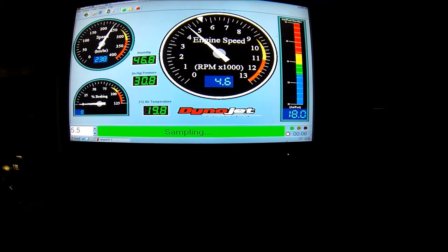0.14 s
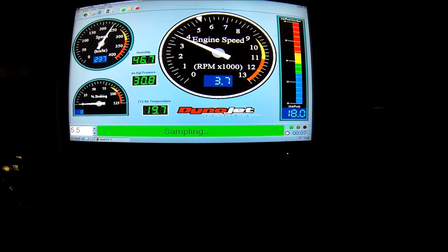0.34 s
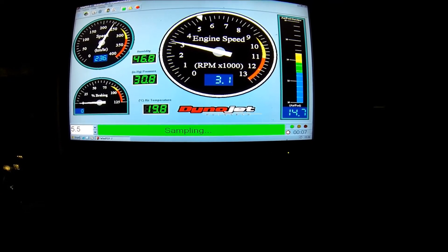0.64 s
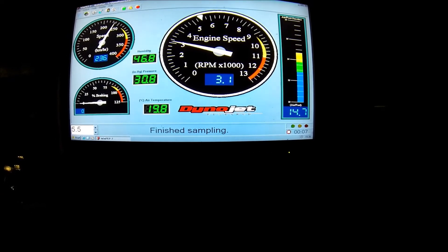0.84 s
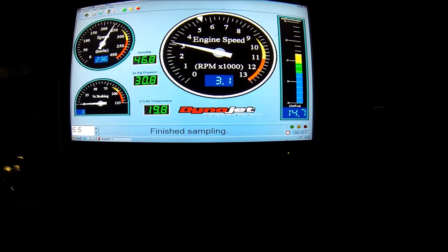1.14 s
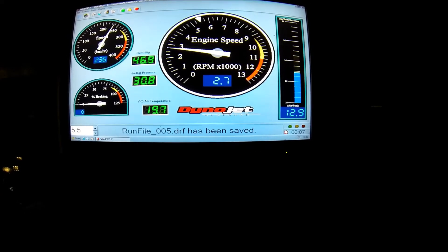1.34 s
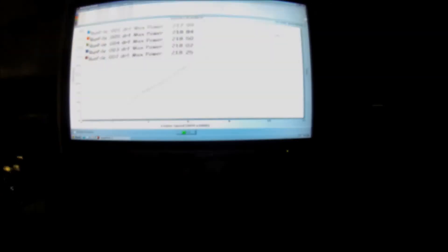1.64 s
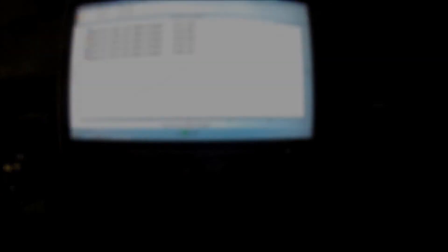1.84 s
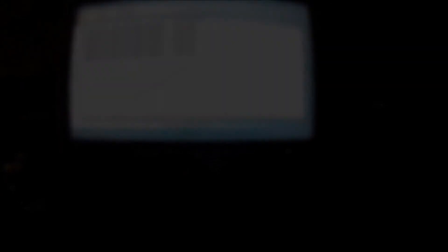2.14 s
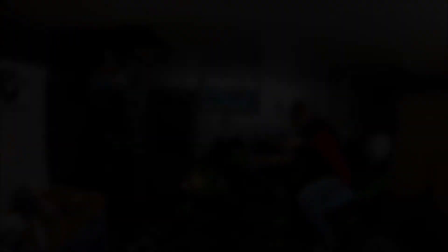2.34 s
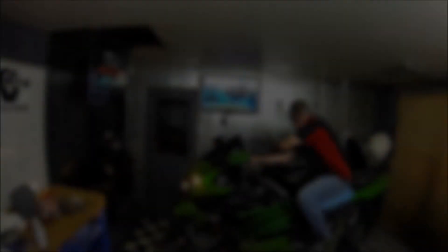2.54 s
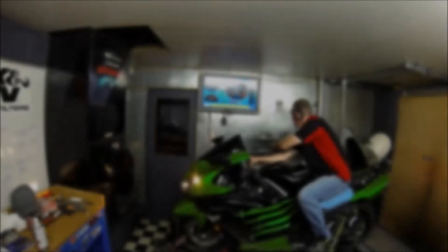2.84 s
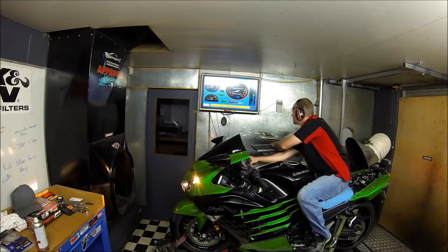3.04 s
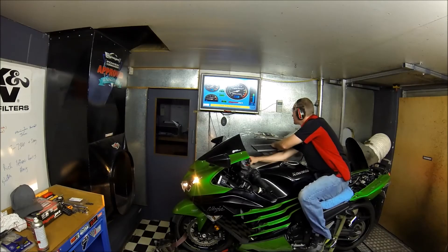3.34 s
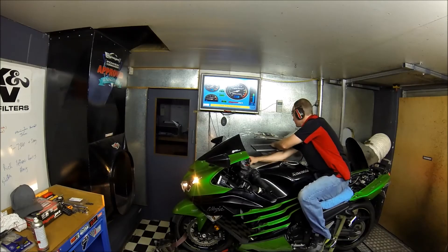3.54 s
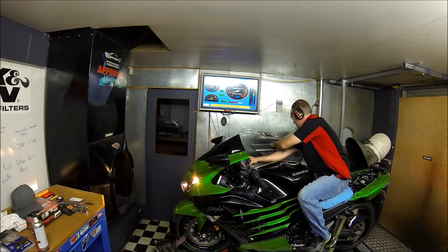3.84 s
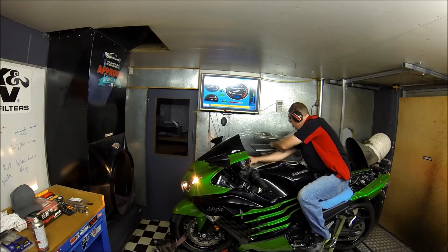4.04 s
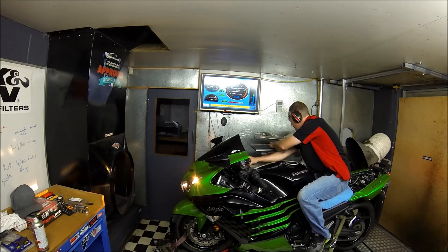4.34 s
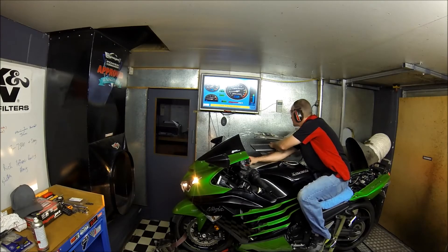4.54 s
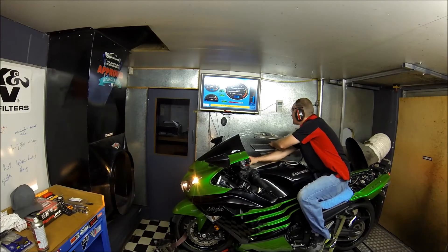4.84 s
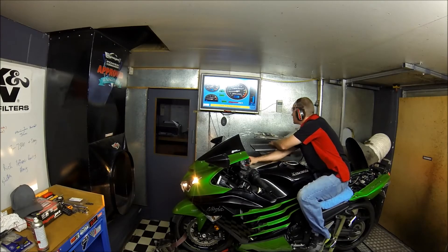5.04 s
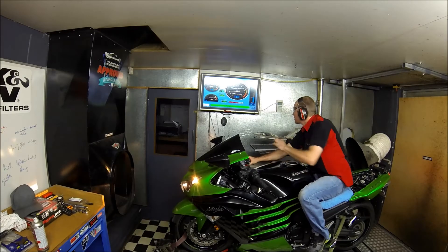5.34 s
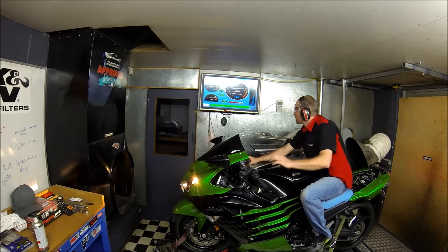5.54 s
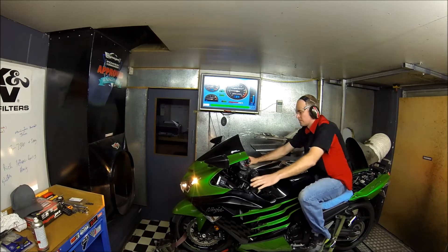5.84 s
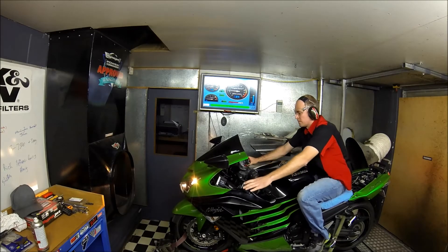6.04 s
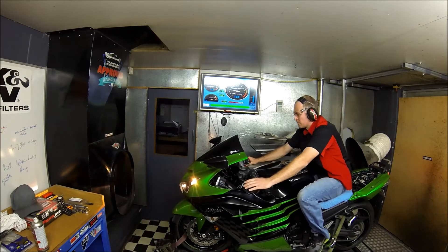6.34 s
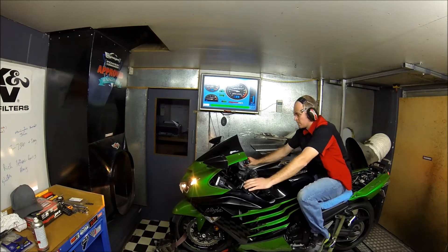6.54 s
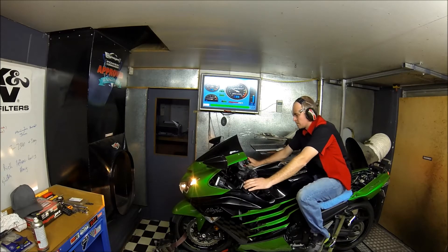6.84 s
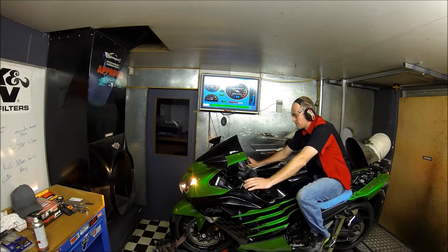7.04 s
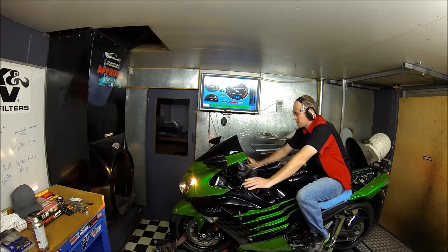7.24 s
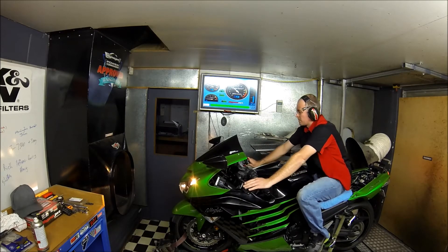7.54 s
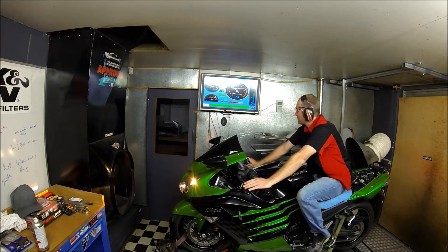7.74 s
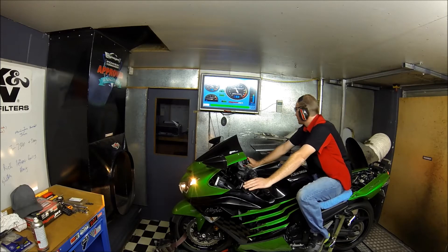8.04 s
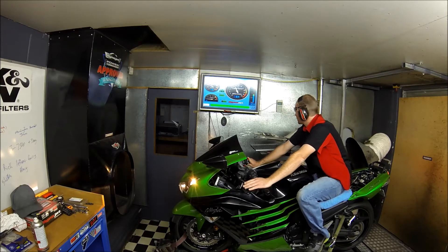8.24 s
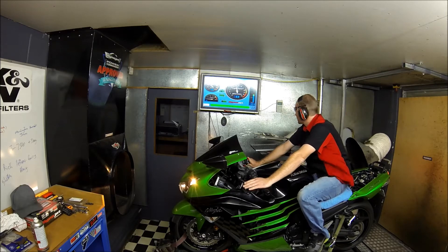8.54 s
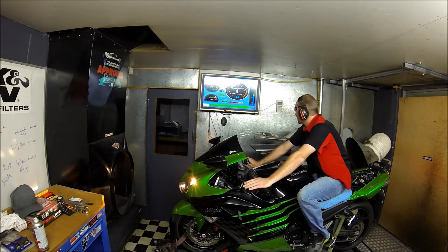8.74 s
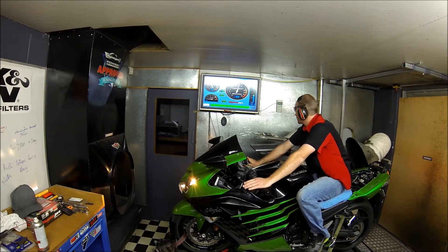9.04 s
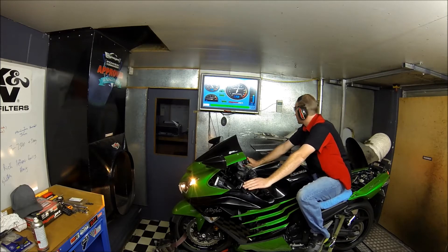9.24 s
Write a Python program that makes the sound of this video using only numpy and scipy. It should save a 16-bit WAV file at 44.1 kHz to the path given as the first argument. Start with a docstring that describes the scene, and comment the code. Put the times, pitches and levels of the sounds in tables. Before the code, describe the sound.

A motorcycle on a rolling drum coasts down with whine and rumble, settles to lumpy idle, then pulls and climbs into a loud howl.

```python
"""A four-cylinder motorcycle on a rolling-road dyno in a small hard-walled workshop. First the drum coasts,
whining and rumbling (sines and filtered noise), while low engine orders slide down. Both fade out by about 2.8
s as a lumpy idle takes over: sines at multiples of the firing rate, each wobbling on its own. From about 3 s
the engine pulls and climbs to a howl, its orders dipping through the room's nulls. Rumble, roar and hiss run
throughout; a gas rush and a high chain whine join during the climb."""
import sys
import numpy as np
from scipy import signal
from scipy.fft import rfft, irfft
from scipy.io import wavfile

SR = 44100
rng = np.random.default_rng(int(sys.argv[2]) if len(sys.argv) > 2 else 0)


def master_out(mix):
    """Clip the mix to full scale and print it as 16-bit PCM to the path in sys.argv[1]."""
    frames = np.transpose(np.atleast_2d(mix))
    ceiling = np.clip(frames, -1, 1)
    pcm = np.round(ceiling * 32767).astype(np.int16)
    wavfile.write(sys.argv[1], SR, pcm)


N = 414099
HOP = 40   # samples per step of the slow controls


def from_db(db):
    """Turn decibels into gain."""
    return 10 ** (np.asarray(db) / 20)


def rms_one(x):
    """Scale to rms 1."""
    return x / np.sqrt(np.mean(x ** 2) + 1e-20)


def in_steps(rows):
    """Read each column of a table over time, one value per slow step."""
    s, *columns = np.transpose(rows)
    step_s = np.arange(N // HOP + 2) * HOP / SR
    return [np.interp(step_s, s, column) for column in columns]


def per_sample(steps):
    """Stretch slow steps to one value per sample."""
    return np.interp(np.arange(N) / HOP, np.arange(len(steps)), steps)


def on_log(points, at):
    """Read a two-column table along a logarithmic axis."""
    points = np.array(points)
    return np.interp(np.log(at), np.log(points[:, 0]), points[:, 1])


def drift(rate_hz):
    """Slow random wander with spread 1: noise through a two-pole low-pass."""
    r = np.exp(-2 * np.pi * rate_hz * HOP / SR)
    noise = rng.standard_normal(N // HOP + 2002)
    wander = signal.lfilter([1], [1, -2 * r, r * r], noise)
    return rms_one(wander[2000:])   # drop the filter's start-up


def turn(hz):
    """Add up a changing frequency into a running phase in radians."""
    return 2 * np.pi * np.cumsum(hz) / SR


def random_phase():
    """Pick a random starting angle in radians."""
    return rng.uniform(0, 2 * np.pi)


# Dips where the room's standing waves cancel sound at the microphone.
# Each row: frequency in Hz, width in Hz, full depth in dB.
ROOM_NULLS = [(66.4, 4.6, -9.5), (82.6, 3.3, -11), (114, 2.8, -11), (139.6, 3.3, -9.5), (163.3, 5.7, -26),
              (229.4, 10.3, -10.5), (342.7, 6.5, -21.5), (355, 3.2, -8.5), (421.5, 12, -11), (451, 9.5, -7),
              (484.7, 12, -13.5), (505.1, 20, -18), (573, 18.8, -18.5), (600, 16, -14), (636, 11.6, -13.5),
              (661, 6.9, -9.5), (732, 37, -9), (801, 33, -10.5), (870, 42, -14.5), (946, 11.4, -15),
              (997, 25, -13.5), (1117, 45, -16.5), (1262, 19, -5), (1366.6, 53, -10), (1567, 108, -8.5),
              (1660, 19, -5), (1739, 42, -8.5), (1840, 26, -4.5), (1977, 38, -14)]


def coloured(x, points, null_share):
    """Minimum-phase filter, which never rings early: a broad shape plus a share of the room's null depth."""
    size = 2 ** 15
    hz = np.maximum(np.arange(size // 2 + 1) * SR / size, 1)
    level_db = on_log(points, hz)
    for centre_hz, width_hz, depth_db in ROOM_NULLS:
        level_db += null_share * depth_db / (1 + (2 * (hz - centre_hz) / width_hz) ** 2)
    # folding the cepstrum forward in time makes the filter minimum-phase
    cepstrum = irfft(np.log(from_db(level_db)))
    cepstrum[1:size // 2] *= 2
    cepstrum[size // 2 + 1:] = 0
    response = irfft(np.exp(rfft(cepstrum)))
    return signal.fftconvolve(x, response)[:N]


def coloured_noise(points, null_share):
    """Shape random noise with a filter and bring it to rms 1."""
    return rms_one(coloured(rng.standard_normal(N), points, null_share))


IDLE_FIRINGS_PER_S = 43.93
# How the pull gains speed against the drum's inertia.
# Each row: time in seconds, firings per second gained each second.
TORQUE = [(3.05, 0), (3.85, 15.96), (4.85, 12.96), (5.5, 21.62), (6.65, 46.06), (7.3, 48.72), (8.5, 59.4),
          (9.39, 60.57)]


def revs():
    """Firings per second in slow steps: idle plus all the speed gained so far."""
    return IDLE_FIRINGS_PER_S + np.cumsum(in_steps(TORQUE)[0]) * HOP / SR


# Air, tyre and valve-gear noise.
# Each row: time in seconds, rumble in dB, then roar and hiss in dB before their trims.
NOISE_LEVELS = [(0.0, -32, -38.5, -49), (0.4, -30, -36, -44.5), (1.02, -34, -36, -45.5),
                (2.2, -36, -43, -53.5), (2.67, -28, -40, -57), (3.2, -28.5, -40, -59),
                (5.05, -26.5, -37, -52), (5.57, -38, -34, -49), (5.9, -23, -30, -41.5),
                (6.12, -27, -28.5, -41), (6.33, -39, -29.5, -44.5), (7.2, -36, -32, -47),
                (7.9, -35, -29, -46), (8.1, -38, -29.5, -47), (8.6, -46, -29.5, -49), (8.93, -45, -27, -47),
                (9.05, -49, -29.5, -48.5), (9.3, -47, -26, -45.5)]
# Colours of the three noises. Each row: frequency in Hz, relative level in dB per Hz.
RUMBLE_COLOUR = [(15, -38), (25, -2.5), (54, 2.5), (130, -11), (195, -6), (350, -20.5), (541, -17.5),
                 (600, -26.5), (900, -23), (1170, -29.5), (1980, -120)]
ROAR_COLOUR = [(300, -37.5), (500, 2), (800, -3.5), (1500, 0), (2500, -8.5), (4000, -16.5), (6000, -23.5),
               (9000, -49.5)]
HISS_COLOUR = [(2650, -45.5), (4500, -9.5), (4860, -5.5), (5040, -11), (6910, -4), (8260, -7),
               (9200, -14.5), (10400, -11.5), (12600, -19.5), (13600, -18), (15200, -12.5)]
ROAR_TRIM_DB, HISS_TRIM_DB = -1, 7.5
CHUFF_DEPTH = .1   # share of the roar's gain
# Gas rush at the tailpipe under full throttle. Each row: time in seconds, level in dB.
RUSH_LEVEL = [(5.3, -64), (5.8, -54), (6.05, -36.5), (6.4, -31), (6.8, -31.5), (7.2, -40), (7.7, -35),
              (8.2, -38), (9.39, -41)]
# Colour of the rush. Each row: frequency in Hz, relative level in dB per Hz.
RUSH_COLOUR = [(700, -50), (1150, 6), (1500, 4.5), (1800, -10.5), (2600, -32.5)]


def air(firing):
    """Filtered noises: roar and hiss gust slightly, and the roar chuffs with every crank turn."""
    rumble_db, roar_db, hiss_db = in_steps(NOISE_LEVELS)
    rush_db, = in_steps(RUSH_LEVEL)
    gust_db = .3 * drift(7)
    roar_db = roar_db + ROAR_TRIM_DB + gust_db
    hiss_db = hiss_db + HISS_TRIM_DB + gust_db + .5 * drift(7)
    chuff = 1 + CHUFF_DEPTH * np.sin(firing / 2)   # two firings per crank turn
    rumble = per_sample(from_db(rumble_db)) * coloured_noise(RUMBLE_COLOUR, .6)
    roar = per_sample(from_db(roar_db)) * chuff * coloured_noise(ROAR_COLOUR, .6)
    hiss = per_sample(from_db(hiss_db)) * coloured_noise(HISS_COLOUR, .6)
    rush = from_db(per_sample(rush_db)) * coloured_noise(RUSH_COLOUR, .61)
    return rumble + roar + hiss + rush


OVERRUN_START_HZ, OVERRUN_END_HZ = 128, 20   # firing rate at the start, and the rate it sinks towards
OVERRUN_DROP_S = 1.4   # time constant of the exponential sinking
OVERRUN_FADE_START_S, OVERRUN_FADE_S = 1.44, 0.34
# Relative levels in dB of the 1st, 2nd and 3rd order of the firing rate.
OVERRUN_ORDERS_DB = [1.4, -1.5, -5.5]
# The way from exhaust to microphone during the coast, standing waves included.
# Each row: frequency in Hz, level in dB.
COAST_PATH = [(45, -39), (62, -32), (74, -39), (84, -29.5), (97, -38.5), (105, -35.5), (114, -42.5),
              (130, -39.5), (150, -40), (165, -34.5), (198, -39.5), (225, -27.5), (260, -41), (400, -56)]


def overrun():
    """Low orders of the closed-throttle engine, sliding down through the room's standing waves."""
    s = np.arange(N) / SR
    above_end_hz = (OVERRUN_START_HZ - OVERRUN_END_HZ) * np.exp(-s / OVERRUN_DROP_S)
    phase = turn(OVERRUN_END_HZ + above_end_hz)
    note = np.zeros(N)
    for order, db in enumerate(OVERRUN_ORDERS_DB, start=1):
        gain = per_sample(from_db(db + 1.3 * drift(13)))
        note += gain * np.sin(order * phase)
    fade = np.clip(1 - (s - OVERRUN_FADE_START_S) / OVERRUN_FADE_S, 0, 1)
    return coloured(np.sqrt(2) * note * fade, COAST_PATH, 0)


# The coasting drum.
# Each row: time in seconds, whine in dB before each line's own level, rumble in dB.
DRUM_LEVELS = [(0.0, -56, -38), (0.25, -47.5, -37.5), (0.88, -43.5, -37.5), (1.25, -46, -43),
               (1.62, -45.5, -58.5), (2.3, -52.5, -45.5)]
# Whine lines that each swell to a peak and sink at their own time. Each row: multiple of the drum pulse,
# peak time in seconds, peak level in dB, rise in dB per second, fall in dB per second.
SWELLS = [(5, 0.77, -38.5, 16, 10.5), (6, .88, -30.5, 11, 17.5), (8, 1.6, -41, 5, 27),
          (10.51, 1.8, -51.5, 1.5, 21), (14, 0.81, -48.5, 8, 12.5), (19.11, .05, -50.5, 1.5, 4.5)]
# The other whine lines, as multiples of the drum pulse; multiples of about 21/8 are a second mesh.
WHINE_MULTIPLES = [2, 3, 4, 7, 9, 10, 11, 12, 15, 16, 17, 20, 21, 22, 23, 26, 28, 5.255, 7.882, 18.39]
# Level of each of those lines, in the same order, in dB relative to the whine.
WHINE_LINES_DB = [-7.5, -5, 0, 0.5, -5, -8, -7.5, -9, -15, -10.5, -23, -21, -20, -16, -7, -10, -9, -2.5, -3,
                  -27]
# Colour of the drum's rumble. Each row: frequency in Hz, relative level in dB per Hz.
DRUM_RUMBLE_COLOUR = [(150, -24), (250, -4), (361, -8), (405, 1.5), (443, -6), (487, -5), (700, -20),
                      (910, -57), (1540, -120)]
DRUM_HZ, DRUM_SAG_HZ_PER_S = 276.8, 2.9   # drum pulse at the start, and how fast it slows
DRUM_GONE_S, DRUM_FADE_S = 2.76, 0.54


def drum():
    """Whine and rolling rumble of the slowing drum; each whine line wavers alone, then all fades out."""
    whine_db, rumble_db = in_steps(DRUM_LEVELS)
    s = np.arange(len(whine_db)) * HOP / SR
    phase = turn(per_sample(DRUM_HZ - DRUM_SAG_HZ_PER_S * s))
    lines = []
    for multiple, peak_s, peak_db, rise, fall in SWELLS:
        below_peak_db = np.maximum(rise * (peak_s - s), fall * (s - peak_s))
        lines.append((multiple, peak_db - below_peak_db + 0.62 * drift(4.6)))
    for multiple, db in zip(WHINE_MULTIPLES, WHINE_LINES_DB):
        lines.append((multiple, whine_db + db + 2.15 * drift(2.3)))
    whine = np.zeros(N)
    for multiple, db in lines:
        whine += per_sample(from_db(db)) * np.sin(multiple * phase + random_phase())
    rumble = per_sample(from_db(rumble_db)) * coloured_noise(DRUM_RUMBLE_COLOUR, 0)
    fade = np.clip((DRUM_GONE_S - np.arange(N) / SR) / DRUM_FADE_S, 0, 1)
    return (np.sqrt(2) * whine + rumble) * fade


MESHES_PER_FIRING = 2.052
# Chain whine in the pull. Each row: time in seconds, level in dB before the two tables below.
CHAIN_LEVEL = [(5.5, -70), (6.5, -56), (6.9, -49), (7.4, -47), (7.9, -47), (8.3, -50), (9.39, -50)]
# Each row: multiple of the chain mesh, relative level in dB.
CHAIN_MULTIPLES = [(10, -1), (11, -2), (12, 0), (13, -1), (14, -3), (15, -1), (16, -2), (17, -2), (18, -4),
                   (19, -3), (21, -7)]
# What the chain whine radiates best. Each row: frequency in Hz, level in dB.
CHAIN_BODY = [(2500, -3), (3100, -2), (3600, -8), (4500, -8), (4900, 1), (5250, 0), (5700, -5), (6300, -9),
              (8000, -14), (11000, -22)]


def chain(firing):
    """High multiples of the chain mesh climb with the engine and stand out as they cross the 5 kHz region."""
    level_db, = in_steps(CHAIN_LEVEL)
    whine = np.zeros(N)
    for multiple, db in CHAIN_MULTIPLES:
        gain = per_sample(from_db(level_db + db + 1.4 * drift(4)))
        whine += gain * np.sin(multiple * MESHES_PER_FIRING * firing)
    return coloured(whine, CHAIN_BODY, 0)


# The exhaust note. Each row: time in seconds, relative load in dB, rasp in dB added to orders above 5.
LOAD = [(1.6, -15.5, -3.5), (2.1, -7.5, -10), (2.5, -2, -1), (3.0, -1, -5), (3.5, 6, -5.5), (4.0, 5, -2),
        (4.6, 7, -4.5), (5.0, 9, -3.5), (5.5, 13, -5), (5.95, 9, -1), (6.1, 10.5, -.5), (6.65, 9.5, 0),
        (6.85, 6.5, 2.5), (7.3, 3.5, 2.5), (7.9, 0, 0), (8.3, -1.5, -3), (8.8, -2.5, 1.9), (9.39, -1, -7)]
# Pipe tuning. Each row: order (multiple of the firing rate), relative level in dB.
PIPE = [(.25, 3.5), (.5, -6), (1, 1.66), (1.5, -5.5), (2, 0.4), (2.5, -4.5), (3, 1.3), (3.5, -0.5), (4, 2),
        (5, 2), (6, 1), (8, 0.9), (10.5, -3), (14, -5)]
# The note brightens with speed. Each row: firings per second, dB per octave of order.
TILT = [(44, -9.5), (76, -8.5), (100, -6.5), (140, -6), (182, 0.4), (265, 2)]
# Strong-weak firing, marked at idle and for one stretch of the pull.
# Each row: time in seconds, relative level of the half orders in dB, extra dB on the lowest of them.
STRONG_WEAK = [(3.0, -3, 2), (3.5, -13.5, .1), (5.3, -9, 4), (5.8, -10, 7), (6.1, -10, 1), (6.7, -14.5, -2),
               (6.8, -0.5, -1.5), (7.1, 0, 4), (7.3, 2, 5), (7.6, -8, 12), (7.8, -12.5, 7),
               (8.3, -12.5, -8), (9.39, -8.5, -6.5)]
# The way from exhaust to microphone, broad shape. Each row: frequency in Hz, level in dB.
EXHAUST_PATH = [(30, -33), (53, -25.5), (75, -26), (98, -43.5), (135, -24), (190, -14.5), (245, -15.5),
                (280, -24.5), (380, -16), (540, -18.5), (690, -20.5), (850, -30), (1500, -29.5),
                (4000, -60)]
# One odd cylinder sets the quarter orders: smoothed out by speed, plain at idle.
ODD_CYLINDER_DB, ODD_DB_PER_OCTAVE, ODD_IDLE_DB = -19, -2.5, 5.5
UNEVEN_RASP_DB = 4.5   # extra on half and quarter orders above 5
WOBBLE_DB, IDLE_WOBBLE_DB = 1.2, 1.4   # always, and extra at idle; both double on quarter orders
FULL_IDLE_HZ = 47   # idle unevenness is full below this firing rate and fades above it


def exhaust(firing):
    """Orders of the firing rate; uneven cylinders add half and quarter orders; each wobbles on its own."""
    load_db, rasp_db = in_steps(LOAD)
    half_db, lowest_db = in_steps(STRONG_WEAK)
    hz = revs()
    idling = np.clip((FULL_IDLE_HZ / hz) ** 6, 0, 1)
    tilt_db = on_log(TILT, hz)
    octaves_above_idle = np.log2(hz / IDLE_FIRINGS_PER_S)
    quarter_db = ODD_CYLINDER_DB + ODD_DB_PER_OCTAVE * octaves_above_idle + ODD_IDLE_DB * idling
    wobble_db = WOBBLE_DB + IDLE_WOBBLE_DB * idling
    uneven_db = (0, quarter_db, half_db, quarter_db)   # whole, quarter, half, three-quarter orders
    note = np.zeros(N)
    quarter_spin = np.exp(.25j * firing)
    spin = 1
    for k in range(1, 57):   # k counts quarter orders
        order = k / 4
        spin = spin * quarter_spin   # a rotating arrow at this order's speed
        if k % 2 and order > 10:
            continue
        level_db = load_db + on_log(PIPE, order) + uneven_db[k % 4]
        level_db = level_db + tilt_db * np.log2(max(order, 1))
        if order == .5:
            level_db += lowest_db
        if order > 5:
            level_db += rasp_db + UNEVEN_RASP_DB * (k % 4 > 0)
        level_db += wobble_db * (1 + k % 2) * drift(8)
        if order > 3.2:   # upper orders also swell and fade
            level_db += 2.2 * drift(5)
        tone = (spin * np.exp(1j * random_phase())).imag
        note += per_sample(from_db(level_db)) * tone
    return coloured(np.sqrt(2) * note, EXHAUST_PATH, 0.92)


def scene():
    """Add all sources together; chuff, chain and exhaust share one slightly unsteady firing phase."""
    firing = turn(per_sample(revs() * (1 + .001 * drift(9))))
    # the coasting engine has its own phase
    mix = air(firing) + overrun() + drum() + chain(firing) + exhaust(firing)
    return mix[None, :]


# Colour of the microphone housing. Each row: frequency in Hz, level in dB.
HOUSING = [(1080, 0), (1180, 8.5), (1600, 12), (1950, 2.5), (2250, 7.5), (2680, 1), (3000, 10), (3600, 6.5),
           (4250, 5.5), (4620, -3), (5000, 7.5), (6200, -1.5), (6600, -5), (15500, -6)]
CUTOFF_HZ = 15420   # from here up the sound is at least 70 dB down
PEAK_LIMIT = .95   # rounded peaks stay below this


def record(dry):
    """The housing colours the sound, peaks are rounded, the top is cut."""
    housed = coloured(dry[0], HOUSING, 0)
    rounded = PEAK_LIMIT * np.tanh(housed / PEAK_LIMIT)
    low_pass = signal.cheby2(14, 70, CUTOFF_HZ, fs=SR, output="sos")
    return signal.sosfilt(low_pass, rounded)[None, :]


dry = scene()
out = record(dry)
master_out(out)
```